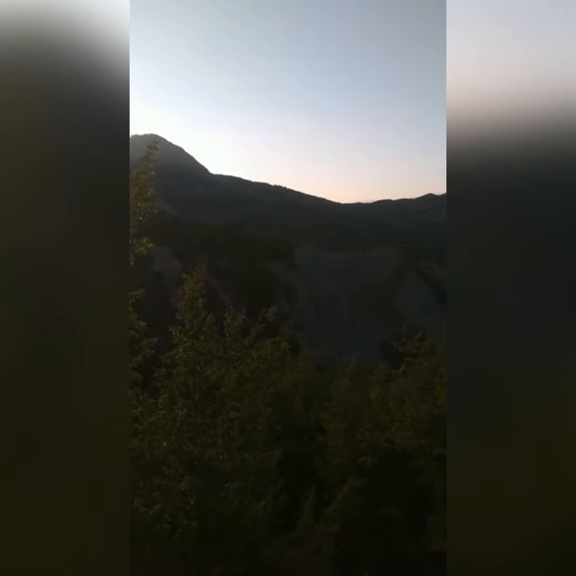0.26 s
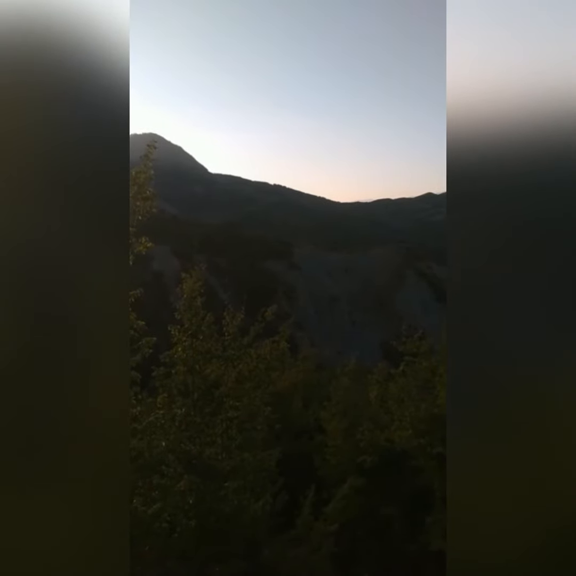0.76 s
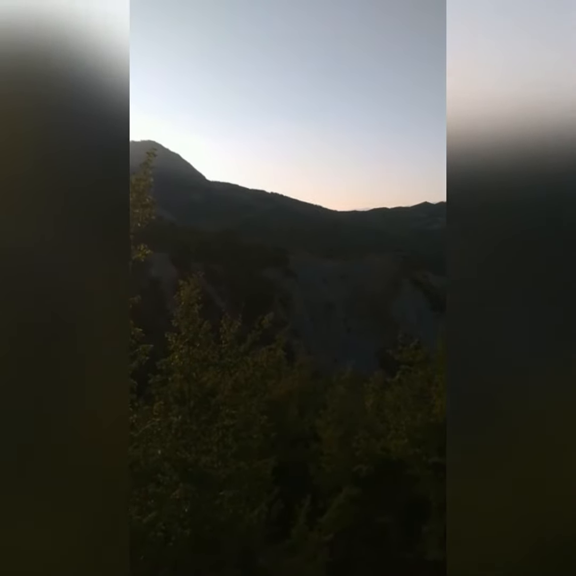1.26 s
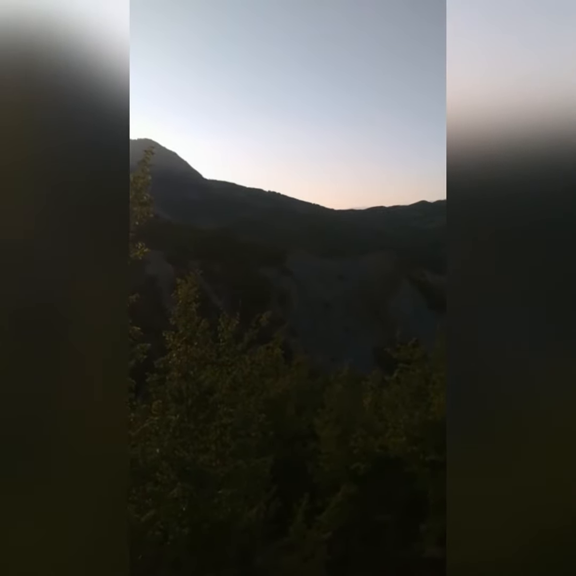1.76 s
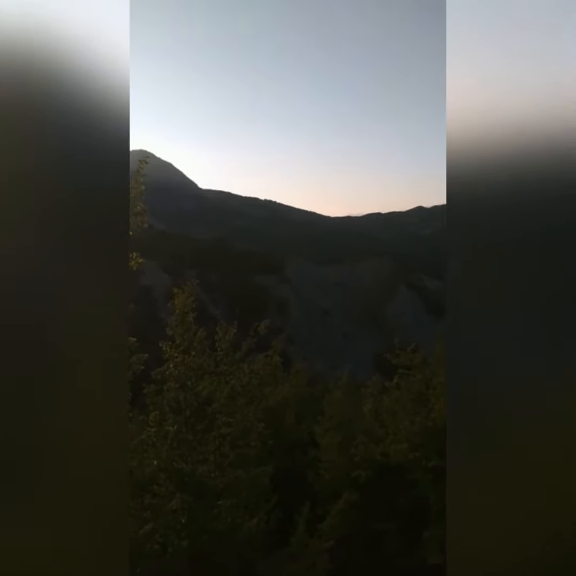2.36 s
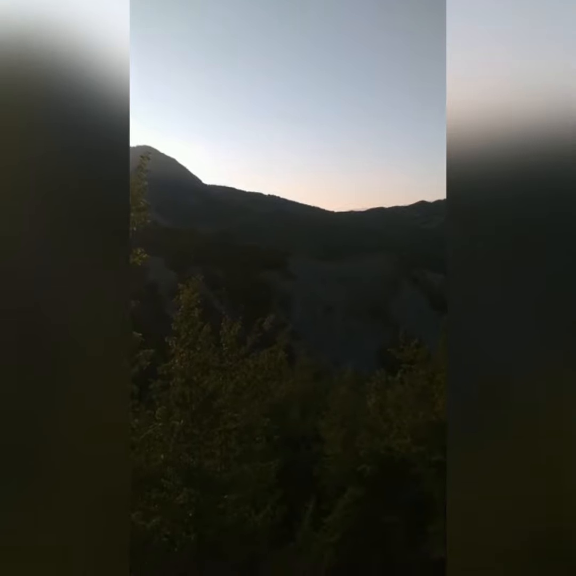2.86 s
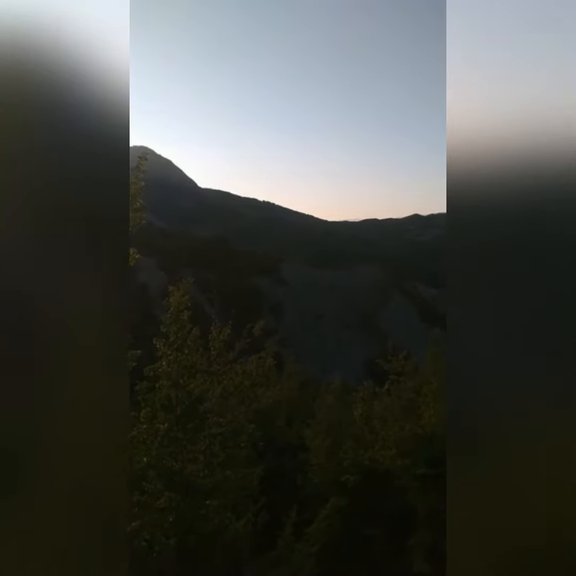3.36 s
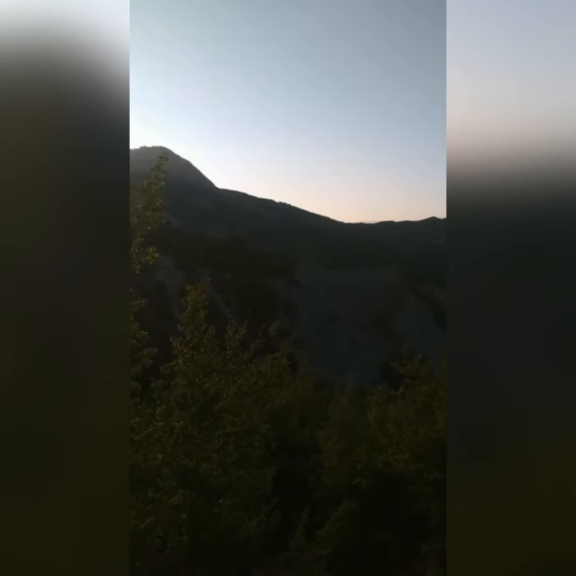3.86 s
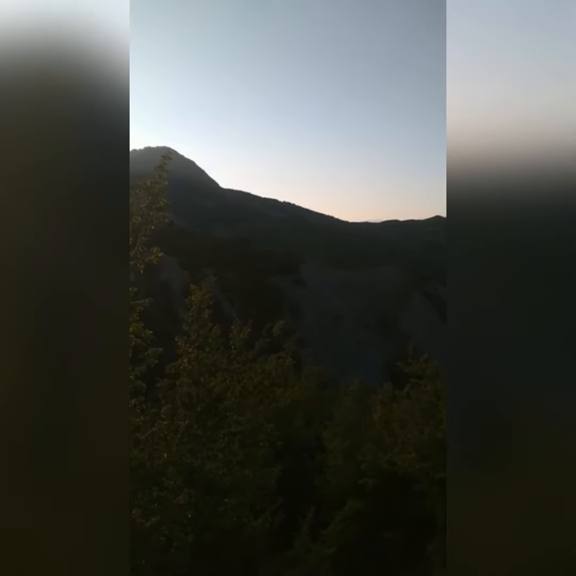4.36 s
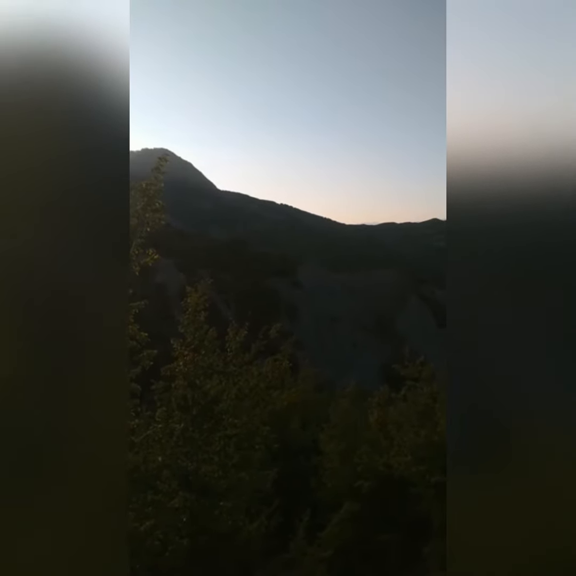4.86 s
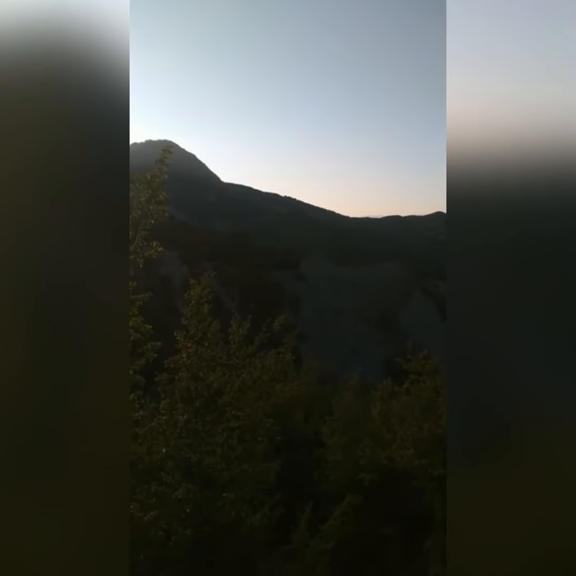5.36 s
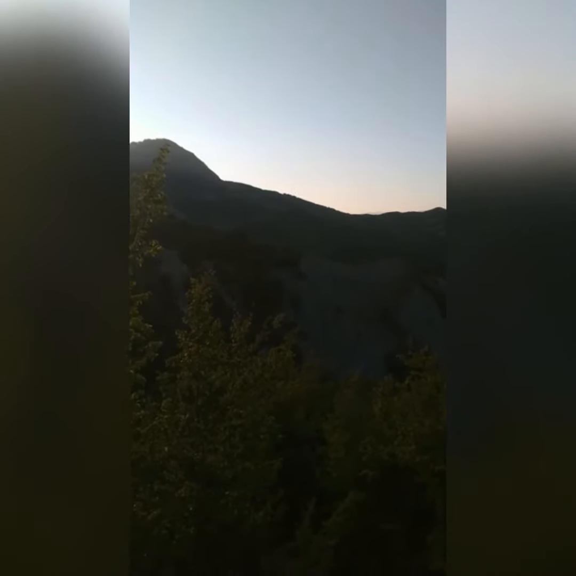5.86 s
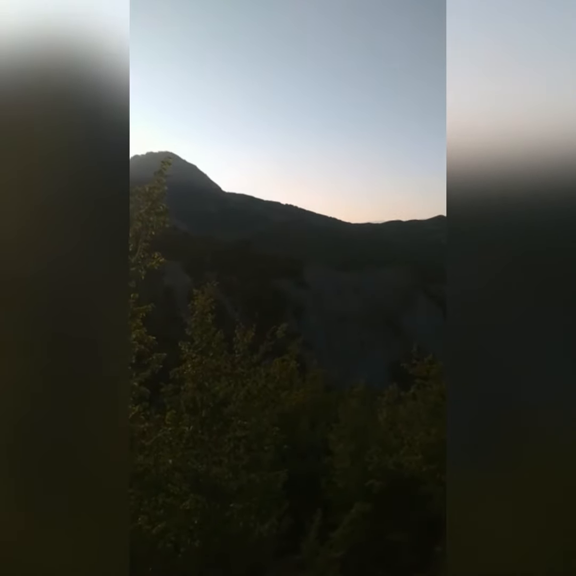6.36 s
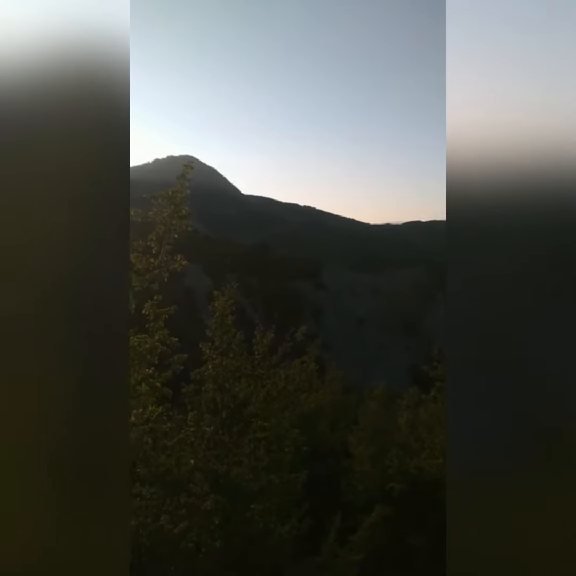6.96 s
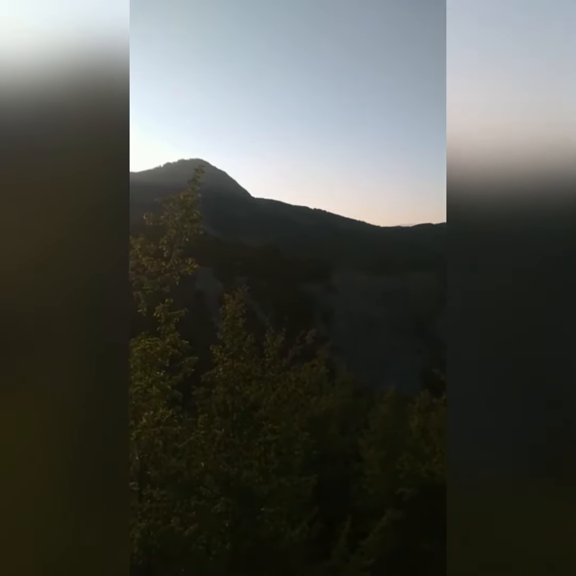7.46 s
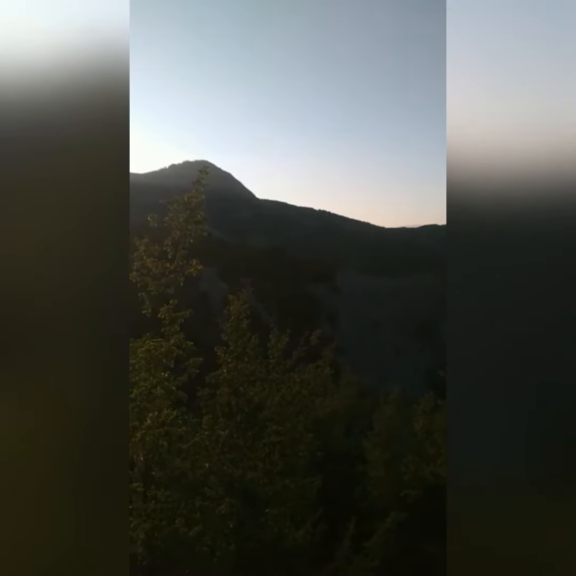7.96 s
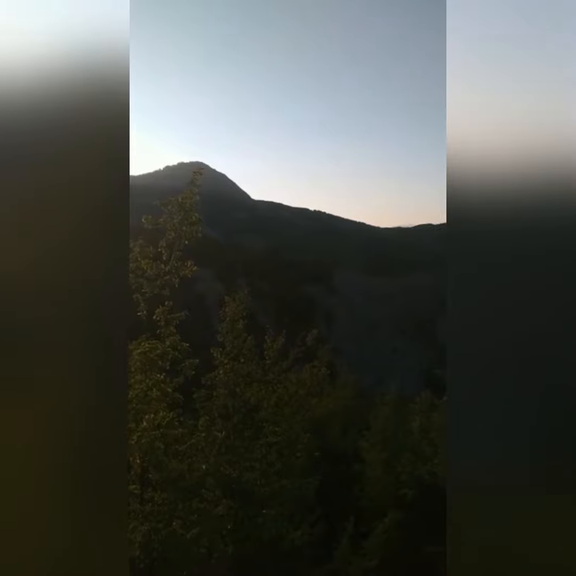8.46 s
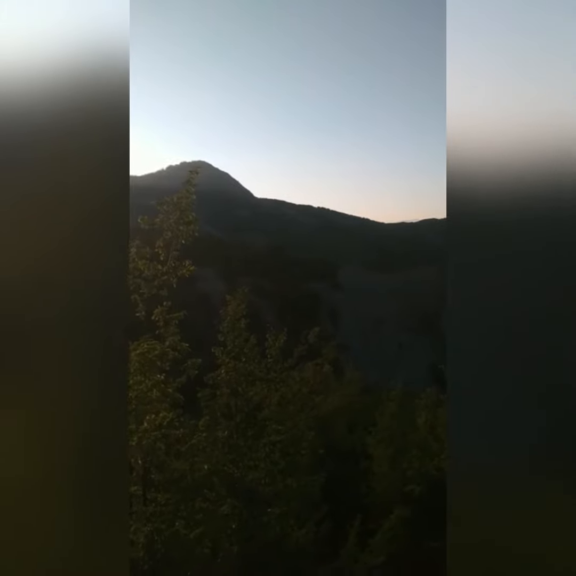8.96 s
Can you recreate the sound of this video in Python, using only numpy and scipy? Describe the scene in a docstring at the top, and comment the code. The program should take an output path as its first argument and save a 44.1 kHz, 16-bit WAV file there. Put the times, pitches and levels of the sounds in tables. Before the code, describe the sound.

Two distant hounds yelp and squeal about twice a second across a ringing wooded valley, with phone-handling knocks and a rubbing burst near the end.

```python
"""Two hounds give tongue far down a wooded valley: harmonic voices, one yelping from low upward, one squealing.
Trees scatter each cry at once and the far slopes ring on: decaying noise convolved with the cries.
A faint rush of filtered noise and a narrow-band drone lie under them; the outdoor level dips briefly at times.
Fingers knock and rub a phone's case near its two microphone ports: pulses, damped modes and shaped noise."""
import sys
import numpy as np
from scipy import signal
from scipy.fft import rfft, irfft, next_fast_len
from scipy.io import wavfile
from scipy.ndimage import uniform_filter1d, map_coordinates

SR = 44100
rng = np.random.default_rng(int(sys.argv[2]) if len(sys.argv) > 2 else 0)


def persist_wave(psi):
    """Save psi, clipped to +-1, as 16-bit WAV."""
    counts = np.round(np.clip(psi, -1, 1) * 32767).astype(np.int16)
    wavfile.write(sys.argv[1], SR, np.atleast_2d(counts).T)


N = 406602
TIME = np.arange(N) / SR

# spectrum of the turbulence in a hound's throat: [f/Hz, relative level/dB]
THROAT_TURBULENCE = [(500, -44), (900, -6.5), (1400, -6), (1800, 3), (2400, 1), (2800, -9), (3150, -38),
                     (3600, -43.5)]
EDGE_S = 0.0072  # fade at both ends of a cry


def amp(db):
    """Level definition: decibels to amplitude gain."""
    return 10 ** (np.asarray(db) / 20)


def unit(x):
    """Normalisation by mean power: x at rms 1."""
    return x / np.sqrt(np.mean(x ** 2) + 1e-20)


def along(points, hz):
    """Logarithmic frequency scale: (f/Hz, value) points interpolated on a log axis."""
    f, v = np.transpose(points)
    return np.interp(np.log(hz + 1), np.log(f + 1), v)


def ramp(t, start, length):
    """Linear transition: 0 before start, rising evenly to 1 over length."""
    return np.clip((t - start) / length, 0, 1)


def wobble(rate, size):
    """Slow random modulation: a smooth curve through random knots, rate of them per second."""
    knots = rng.standard_normal(int(size * rate / SR) + 4)
    return map_coordinates(knots, [np.arange(size) * rate / SR])


def filtered(x, response):
    """Linear filtering: the spectrum of x times a response of frequency."""
    m = next_fast_len(N + SR // 2)
    return irfft(rfft(x, m) * response(np.fft.rfftfreq(m, 1 / SR)), m)[..., :N]


def noise(colour):
    """Spectral shaping: white noise given a colour, at rms 1."""
    return unit(filtered(rng.standard_normal(N), lambda hz: amp(along(colour, hz))))


def wide_noise(colour, side_db):
    """Mid-side stereo: independent middle and side noises, the middle at rms 1."""
    middle = noise(colour)
    side = amp(side_db) * noise(colour)
    return middle + side * np.array([[1], [-1]])


def lean(db):
    """Interaural level difference: left and right gains that are db apart."""
    return amp([[db / 2], [-db / 2]])


def span(s, before, after):
    """Time origin: sample numbers around the moment s, and their times from it."""
    index = np.arange(max(0, int((s - before) * SR)), min(N, int((s + after) * SR)))
    return index, index / SR - s


def air(level_db=-66, drone_rate=35):
    """Broadband and narrow-band noise: a steady rush, and a drone of two quadrature carriers varied at random."""
    # spectrum of the rush: [f/Hz, relative level/dB]
    rush_colour = [(15, -7.5), (28, 5.5), (55, -4), (110, -7.5), (250, -14.5), (500, -17.5), (800, -20.5),
                   (1150, -13.5), (1600, -23.5), (2400, -27), (2900, -34), (3200, -46.5), (4500, -54)]
    # course of a faint far drone: [t/s, f/Hz, level/dB]
    drone_course = [(0, 211, -74.5), (3.4, 216.3, -79), (5.6, 272.1, -81.5), (7, 265.1, -76.5),
                    (9.22, 268, -83)]
    rush = amp(level_db) * wide_noise(rush_colour, side_db=-1)
    s, hz, db = np.transpose(drone_course)
    phase = 2 * np.pi * np.cumsum(np.interp(TIME, s, hz)) / SR
    drone = wobble(drone_rate, N) * np.sin(phase) + wobble(drone_rate, N) * np.cos(phase)
    return rush + amp(np.interp(TIME, s, db)) * drone


def dropouts(smooth_s=0.0022):
    """Amplitude gating: a gain that sinks briefly at set times, nearly released at random instants."""
    # brief dips: [t/s, length/s, depth before smoothing and release/dB]
    dips = [(0.551, .025, -19.5), (0.889, 0.053, -27), (0.969, 0.027, -28), (1.934, .032, -34),
            (2.242, .047, -31.5), (2.327, 0.014, -23.5), (2.354, .025, -20), (2.406, .035, -27.5),
            (3.125, 0.024, -18.5), (3.452, .065, -29), (3.535, .074, -32), (3.89, 0.018, -32.5),
            (4.203, .014, -29), (4.968, .023, -27), (5.004, .085, -25.5), (6.237, .023, -21.5),
            (6.3, .019, -23.5), (6.653, .095, -30), (7.024, .037, -27), (7.446, 0.025, -22.5),
            (7.513, .059, -26.5), (8.673, .024, -22), (8.748, .039, -22.5), (8.975, .05, -30),
            (9.055, .042, -29.5), (9.107, .049, -27.5), (9.178, .06, -29.5)]
    db = sum(depth * ((TIME > s) & (TIME < s + length)) for s, length, depth in dips)
    stutter = wobble(130, N) > 1.3  # scraps of sound slip through
    sunk_db = db * (1 - 0.97 * stutter)
    return amp(uniform_filter1d(sunk_db, max(1, int(smooth_s * SR))))


def knocks(bass_hz=45):
    """Impulse excitation: each touch pushes air into a port and briefly rings the damped modes of the case."""
    # touches: [t/s, push level/dB, contact time/s, case ring level/dB, left minus right/dB];
    # levels stand before the case's filter
    touches = [(1.812, -54, 0.00087, -55.5, 19), (3.1989, -37.5, 0.000096, -34.5, -8.5),
               (3.205, -64, 0.00022, -41, 14), (3.205, -24.5, 0.00033, -19, -15.5),
               (3.406, -66, 0.002, -46, -11), (3.773, -48.5, 0.00024, -76, 7),
               (3.993, -53.5, 0.00057, -52.5, -8), (5.5582, -46.5, 0.0014, -53.5, -22),
               (6.0887, -40, 0.00027, -44, 14.5), (6.109, -47.5, 0.0021, -85, -25),
               (6.126, -45, 0.002, -67, -22), (7.82, -23.5, 0.0091, -53, 25.5),
               (7.829, -32.5, 0.00079, -51.5, 32.5), (7.934, -41, 0.0011, -46.5, 31.5),
               (8.191, -51, 0.0015, -48, 26), (8.2957, -30, 0.00012, -53, 40),
               (8.305, -31, 0.00018, -47.5, 25), (8.314, -19, 0.000047, -76.5, 32.5),
               (8.3146, -26.5, 0.00022, -55, 28.5), (8.8, -34.5, 0.00014, -38, -9.5),
               (8.8671, -47, 0.00017, -75, 19), (8.869, -36, 0.00026, -33, -21),
               (8.902, -38.5, 0.0015, -54, -26.5)]
    # modes of the case: [f/Hz, relative level/dB, t60/s]
    case_modes = [(187, -5, 0.03), (440, -9.5, 0.025), (596, -21.5, 0.043), (1760, -26.5, 0.032)]
    # what the case passes of a knock: [f/Hz, gain/dB]
    case_passes = [(2400, -0.5), (3200, -14.5), (5500, -14.5), (8000, -20), (14000, -38)]
    out, t = np.zeros((2, N)), np.arange(SR // 8) / SR
    ring = sum(amp(db - 60 * t / t60) * np.sin(2 * np.pi * hz * t) for hz, db, t60 in case_modes)
    for s, push_db, contact, ring_db, left_db in touches:
        push = t / contact * np.exp(1 - t / contact)  # peaks at 1 after the contact time
        start = round(s * SR)
        out[:, start:start + len(t)] -= lean(left_db) * (amp(push_db) * push + amp(ring_db) * ring)
    # a first-order high-pass, then the case
    return filtered(out, lambda hz: 1j * hz / (bass_hz + 1j * hz) * amp(along(case_passes, hz)))


def finger(scrape_db=3, hiss_db=3, grain_db=2.5, right_db=-26):
    """Stick-slip friction: skin rubs over the left port as rough noise, then slips off in jerks with a hiss."""
    # rubs: [t of full pressure/s, hold/s, release/s, level before grain/dB]
    rubs = [(7.827, 0.03, 0.14, -36.5), (8.126, 0.079, 0.021, -40.5), (8.42, 0.212, 0.033, -62.5)]
    # jerks: [t of peak/s, attack/s, decay rate/(dB/s), relative scrape level/dB, relative hiss level/dB]
    slips = [(8.316, 0.006, 383, -38, -66), (8.368, 0.021, 237, -50, -92), (8.398, 0.034, 622, -80, -68.5)]
    # spectra of rub, scrape and hiss: [f/Hz, relative level/dB]
    rub_colour = [(20, -24.5), (40, 2.5), (180, -10.5), (400, -11), (800, -15), (1600, -15), (2300, -23),
                  (3100, -44.5), (5500, -67), (8000, -75)]
    scrape_colour = [(60, 0.5), (200, 12), (600, 11.5), (1300, 13), (2000, 13), (2700, 2.5), (3500, -13),
                     (6000, -57.5)]
    hiss_colour = [(2500, -28.5), (4000, 4), (7000, 6), (10000, -16), (13500, -17), (14500, -48)]
    attack_s, range_db = 0.068, 38  # a rub's level changes by the range over its attack or release
    pressure = 0
    for s, hold, release, db in rubs:
        away = np.maximum((s - TIME) / attack_s, (TIME - s - hold) / release)
        pressure = pressure + amp(db - range_db * np.maximum(0, away))
    rub = amp(grain_db * wobble(300, N)) * pressure * noise(rub_colour)
    scrape = hiss = 0
    for s, attack, decay, low_db, high_db in slips:
        jerk = ramp(TIME, s - attack, attack) * amp(-decay * np.maximum(TIME - s, 0))
        scrape = scrape + amp(low_db) * jerk
        hiss = hiss + amp(high_db) * jerk
    slip = amp(scrape_db) * scrape * noise(scrape_colour) + amp(hiss_db) * hiss * noise(hiss_colour)
    return (rub + slip) * amp([[0], [right_db]])


def echo(x, t60_points, delay, build):
    """Diffuse reverberation: convolution with noise that builds up after a delay and decays by its t60."""
    hz, t, z = signal.stft(rng.standard_normal((2, 3 * SR // 2)), SR, nperseg=256)
    decay = amp(-60 * t / along(t60_points, hz)[:, None])
    onset = 1 - np.exp(-np.maximum(t - delay, 0) / build)
    tail = signal.istft(z * (decay * onset), SR, nperseg=256)[1]
    return signal.fftconvolve(x[None], tail / np.linalg.norm(tail[0]), axes=1)[:, :N]


def valley(x, trees_db=-17, slopes_db=-9.0, trees_t60=0.098, drift=0.62, drift_hz=22, swell_db=2):
    """Scattering in moving air: trees answer at once, far slopes ring on, blurred in phase and level."""
    # reverberation of the slopes: [f/Hz, t60/s]
    slopes_t60 = [(300, 0.29), (1100, 1.34), (2200, 1.5), (3200, 1.2), (8000, 0.63)]
    # colour of the far answer: [f/Hz, relative level/dB]
    slopes_colour = [(800, -0.5), (1350, 0.5), (1800, 3), (2600, 2.5), (3200, -3.5)]
    trees = echo(x, [(1000, trees_t60)], delay=0.005, build=0.0041)
    coloured = filtered(x, lambda hz: amp(along(slopes_colour, hz)))
    slopes = echo(coloured, slopes_t60, delay=.012, build=0.0031)
    far = signal.hilbert(slopes, next_fast_len(N))[:, :N]
    paths = np.array([wobble(drift_hz, N), wobble(drift_hz, N)])  # left and right phase drifts
    blurred = np.real(far * np.exp(1j * drift * paths)) * amp(swell_db * wobble(drift_hz, N))
    return amp(trees_db) * trees + amp(slopes_db) * blurred


def voice(t, glide, low_db, octave_db, ending, lead, growl_db, turbulence, jitter=.006, flutter_db=.7,
          rasp_db=-26, collapse=.7, fray=.4, hoarse_db=-16, roar_db=-30):
    """Source-filter voice: throat-coloured harmonics, half-way lines from uneven fold cycles, and breath noise."""
    # overtone colour of the throat: [f/Hz, relative level/dB]
    throat = [(800, 0), (1500, 4), (2100, 11), (2650, 0.5), (2900, -15), (3150, -19.5), (3500, -42.5),
              (5000, -68)]
    overtones_db = -2  # third and fourth harmonics
    size, low, octave = len(t), amp(low_db), amp(octave_db)
    pitch = glide * (1 + jitter * wobble(250, size))
    tension = glide / np.maximum.accumulate(glide)  # falling from its top, the voice turns dull and ragged
    phase = 2 * np.pi * np.cumsum(pitch) / SR + np.array([[lead / 2], [-lead / 2]])

    def upper(k):
        """Formant weighting: the gain of overtone k relative to the octave's colour."""
        return octave * tension ** 4 * amp(along(throat, k * pitch) - along(throat, 2 * pitch))

    partials = [(1, low), (2, upper(1.94))]
    partials += [(k, upper(k) * amp(overtones_db)) for k in (3, 4)]
    partials += [(k, upper(k) * amp(growl_db)) for k in (1.5, 2.5)]
    cry = (amp(hoarse_db) * octave * tension + amp(roar_db) * low) * turbulence
    for k, gain in partials:
        roughness = amp(rasp_db) + 2 * collapse * (1 - tension) + fray * ending
        rasp = roughness * k * wobble(260, size)  # the higher lines fray most
        flutter = amp(flutter_db * k * wobble(114, size))
        cry = cry + np.sqrt(2) * gain * flutter * np.sin(k * phase + rasp)
    # a growling cry shakes in level
    shake_db = 2.6 * np.sqrt(amp(np.minimum(growl_db, 0))) * wobble(90, size)
    edges = np.clip(np.minimum(t - t[0], t[-1] - t) / EDGE_S, 0, 1)
    return cry * amp(shake_db) * edges


def squeals(level_db=3.2):
    """Pitch glide of a nearly pure tone: a soft whine breaks into a rise to a top, then an accelerating fall."""
    # a shriller hound: [t of top/s, rise/s, fall/s, start f/Hz, top f/Hz, end f/Hz, relative tone level/dB,
    # level change in the fall/dB, relative octave level/dB, left minus right/dB, left phase lead/rad]
    squeal_table = [ (1.08, 0.073, 0.037, 1010, 1336, 1335, -44, -10.5, -57, -1.5, -0.61),
                    (1.635, 0.052, 0.054, 1180, 1303, 662, -53.5, -8.5, -71, 2, 0.39),
                    (2.058, 0.017, 0.055, 1385, 1398, 787, -42, -20, -78.5, -5.5, 0.99),
                    (2.533, .014, .06, 1400, 1415, 616, -45.5, -12, -63, -4.5, .88),
                    (4.329, .06, .046, 960, 1446, 946, -45, -11.5, -63.5, -7.5, -0.6)]
    whine_s, break_s = 0.044, .006
    whine_ratio, whine_db = .87, -14  # the whine is lower and softer
    fall_power, swell_db, octave_loss_db, growl_db = 2.5, 7, 23, -19.5
    out, turbulence = np.zeros((2, N)), noise(THROAT_TURBULENCE)
    for row in squeal_table:
        s, rise, fall, start_hz, top_hz, end_hz, tone_db, loss_db, octave_db, left_db, lead = row
        index, t = span(s, rise + whine_s, fall + EDGE_S)
        whine = 1 - ramp(t, -rise - break_s, break_s)
        up, down = ramp(t, -rise, rise), ramp(t, 0, fall)
        arch = (top_hz - start_hz) * up + (end_hz - top_hz) * down ** fall_power
        glide = start_hz * whine_ratio ** whine + arch
        low_db = tone_db + whine_db * whine + swell_db * (up - 1) + loss_db * down ** 2
        high_db = octave_db + whine_db * whine - octave_loss_db * up
        cry = voice(t, glide, low_db, high_db, down, lead, growl_db, turbulence[index])
        out[:, index] += cry * unit(lean(left_db))
    return amp(level_db) * out


def yelps(level_db=.7):
    """Register break: a low reedy lead-in jumps to a loud climbing tone, which cracks upward into a ragged tail."""
    # the leading hound: [t of break/s, hold/s, tail/s, lead-in f/Hz, held f/Hz, climb/share of held f,
    # tail flick/share of held f, relative tone level/dB, level change over the hold/dB,
    # relative octave level/dB, relative lead-in octave level/dB, relative growl level/dB,
    # left minus right/dB, left phase lead/rad]
    yelp_table = [ (0.029, 0.055, 0.036, 859, 1004, .07, .02, -48, -5, -54.5, -54, -11, 1.5, -0.45),
                  (0.317, .095, 0.025, 921, 1013, 0.11, 0.078, -50, -2.5, -63, -63.5, -6.5, 3, 0.27),
                  (0.636, .07, 0.015, 853, 999, 0.053, 0.023, -48.5, -2.5, -58, -49.5, -0.5, 3, -0.76),
                  (2.524, .075, 0.045, 893, 1130, .16, 0.0033, -45.5, -5.5, -52, -46.5, -13.5, 2.5, 1.08),
                  (2.921, .06, .025, 860, 1036, 0.028, 0.019, -43, -7.5, -58.5, -56.5, -8, 5.5, -0.43),
                  (3.184, 0.072, 0.035, 899.5, 1075, .02, 0.035, -47.5, 1.5, -58.5, -59, -4.5, 4, 0.69),
                  (3.641, .09, 0.037, 919, 1076, 0.073, 0.026, -47.5, -11.5, -58, -52, -22.5, -0.5, -0.51),
                  (4.03, 0.071, 0.041, 883, 967.4, 0.16, .16, -45, -10.5, -62, -75, -8.5, 8.5, -0.022),
                  (4.447, .085, 0.017, 878.6, 1030, 0.034, 0.037, -48, 2.5, -53, -53.5, -11, 5.5, -0.33),
                  (4.736, 0.041, 0.074, 906, 1018, 0.006, .19, -39, -3.5, -57, -63, -20.5, 6, -0.27),
                  (5.133, .07, 0.044, 870, 1059, .07, 0.0067, -41.5, -6.5, -64, -58, -4, 3.5, -0.3),
                  (5.53, .135, 0.016, 909, 1147, 0.035, 0.024, -48, -1.5, -62.5, -47.5, -15, 7.5, 0.53),
                  (5.954, 0.051, 0.035, 887.5, 999, 0.019, 0.13, -47, -7, -52.5, -51, -17.5, 4.5, 0.31),
                  (6.364, .075, 0.02, 935, 1057, 0.033, 0.048, -41, -2, -57.5, -66.5, -1, -7, 2.13),
                  (6.814, .058, 0.016, 894, 1070, 0.023, .2, -37, -5.5, -55.5, -44.5, -24, 1, -0.75),
                  (7.186, .072, .025, 925, 1165, 0.06, .08, -46, 0.5, -59.5, -49.5, -14, 4.5, 0.74),
                  (7.608, .09, 0.018, 965, 1177, 0.021, 0.069, -46, 7, -63, -49.5, -27, 7, 0.51),
                  (8.029, 0.06, 0.014, 947, 1040, 0.0057, 0.083, -49.5, -5.5, -53, -55.5, -31, 3.5, 0.0096)]
    lead_in_s, break_s, swell_s, flick_s = .046, .006, 0.035, .007  # the stages of every yelp
    scoop, climb_power = .1, 1.8  # the lead-in starts this share flat; the climb comes late
    lead_in_rise_db, lead_in_tone_db, swell_db = 19.5, -13, 4.5
    release_db, octave_fade_db, crack_db = -8, -2.5, -1.5
    lead_in_growl_db = -13.5  # the growl is weaker before the break
    out, turbulence = np.zeros((2, N)), noise(THROAT_TURBULENCE)
    for row in yelp_table:
        s, hold, tail, lead_in_hz, hz, climb, flick, tone_db, fade_db = row[:9]
        octave_db, lead_in_db, growl_db, left_db, lead = row[9:]
        index, t = span(s, lead_in_s, hold + tail)
        early = 1 - ramp(t, -lead_in_s, lead_in_s - break_s)
        held, cracked, ending = ramp(t, 0, hold), ramp(t, hold, flick_s), ramp(t, hold, tail)
        register = np.interp(t, [-break_s, 0], [lead_in_hz, hz])
        glide = register * (1 - scoop * early + climb * held ** climb_power + flick * cracked)
        effort_db = -lead_in_rise_db * early + crack_db * cracked + release_db * ending
        stages_db = [lead_in_tone_db, -swell_db, 0, fade_db]
        low_db = tone_db + np.interp(t, [-break_s, 0, swell_s, hold], stages_db)
        high_db = np.interp(t, [-break_s, 0], [lead_in_db, octave_db]) + octave_fade_db * held
        growl = growl_db + lead_in_growl_db * (1 - ramp(t, -break_s, 2 * break_s))
        cry = voice(t, glide, low_db + effort_db, high_db + effort_db, cracked, lead, growl,
                    turbulence[index])
        out[:, index] += cry * unit(lean(left_db))
    return amp(level_db) * out


def scene(hiss_db=-99):
    """Superposition: far hounds and air, close handling, and a trace of microphone hiss."""
    pack = yelps() + squeals()
    outdoors = pack + valley(pack.mean(axis=0)) + air()
    hiss = amp(hiss_db) * wide_noise([(4000, -6), (12500, -17.0), (13500, -38.5)], side_db=1)
    sink = dropouts()
    # the hiss dips by only a fraction of the outdoor decibels
    return outdoors * sink + hiss * sink ** 0.21 + knocks() + finger()


def record(dry, top_hz=15800):
    """Band limiting: an ideal low-pass removes everything from its limit upward."""
    return filtered(dry, lambda hz: hz < top_hz)


dry = scene()
out = record(dry)
persist_wave(out)
```